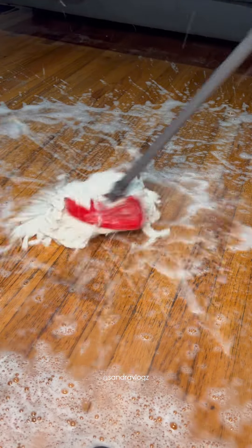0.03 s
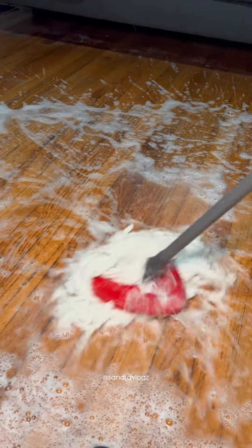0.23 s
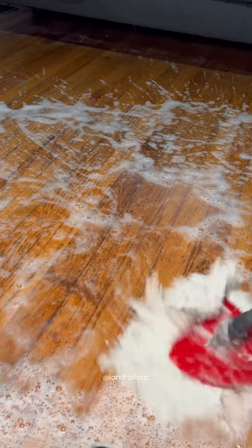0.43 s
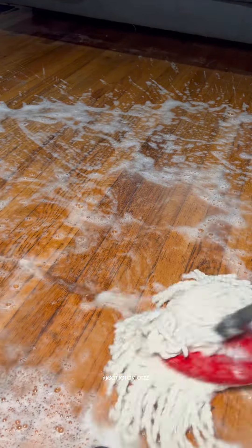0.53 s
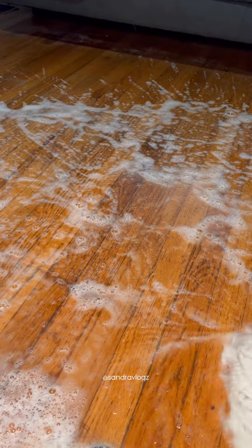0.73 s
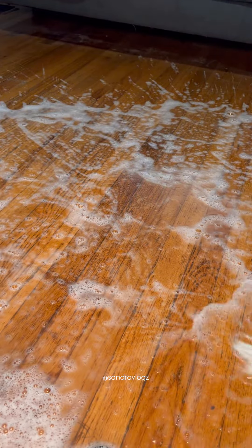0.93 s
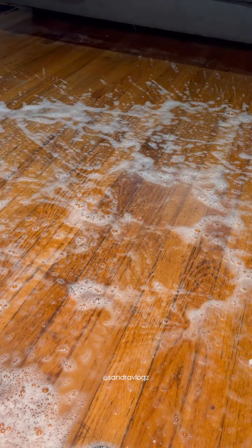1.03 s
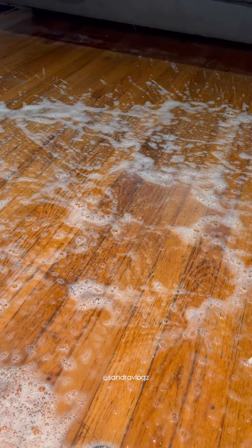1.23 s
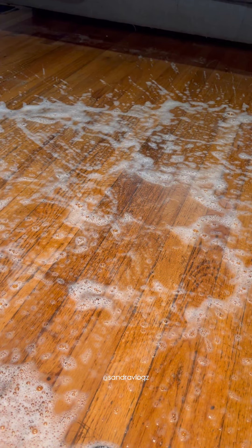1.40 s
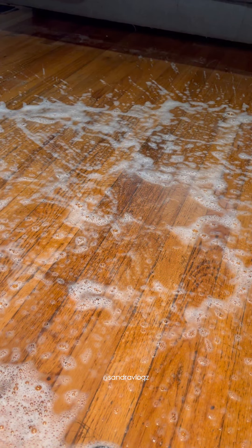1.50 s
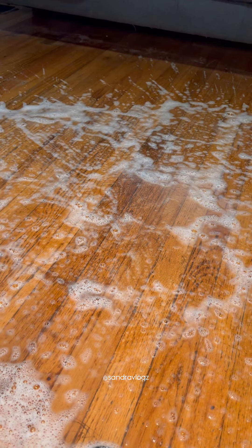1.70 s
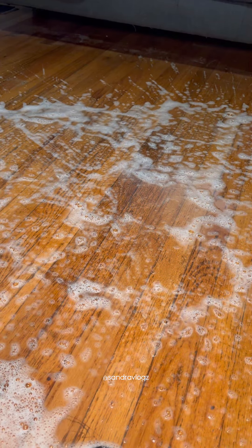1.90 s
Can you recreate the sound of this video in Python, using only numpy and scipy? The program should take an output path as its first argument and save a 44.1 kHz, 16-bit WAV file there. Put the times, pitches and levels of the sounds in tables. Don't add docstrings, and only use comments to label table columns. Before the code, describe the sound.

A soaked string mop slaps a soapy wooden floor in wet, thudding hits, then nearly stops

```python
import sys
import numpy as np
from scipy import signal
from scipy.fft import rfft, irfft, next_fast_len
from scipy.io import wavfile
from scipy.ndimage import uniform_filter1d

SR = 44100
rng = np.random.default_rng(int(sys.argv[2]) if len(sys.argv) > 2 else 0)


def to_wav(sig):
    pcm = np.clip(np.atleast_2d(sig), -1, 1) * 32767
    pcm = np.round(pcm).astype(np.int16)
    wavfile.write(sys.argv[1], SR, pcm.T)


def voltage_ratio(level):
    return 10 ** (np.asarray(level, float) / 20)


N = 85995
LEAD = 8820
M = next_fast_len(N + 2 * LEAD)
T = (np.arange(M) - LEAD) / SR
F = np.arange(M // 2 + 1) * SR / M

# [f/Hz, phase/rad]
PORT_LEAD = [(0, 0), (700, .6), (1400, .15), (2000, -.8), (2500, -2.5), (2800, -2.5), (3400, -1.6),
             (4400, -2.1), (5150, -2.1), (5550, -3.14), (7600, -6.28), (10050, -9.42), (11800, -12),
             (13100, -12.9), (14700, -15.6), (16000, -15.8)]
# [f/Hz, share/0-1]
PORT_ALIKE = [(100, 1), (350, .82), (700, .88), (1500, .93), (2500, .75), (3900, .4), (5300, .945),
              (9000, 1)]


def on_log(table):
    hz, value = np.array(table, float).T
    return np.interp(np.log(F + 1), np.log(hz), value)


def colour(x, table):
    no_rumble = F ** 2 / (F ** 2 + 30 ** 2)
    y = irfft(rfft(x) * voltage_ratio(on_log(table)) * no_rumble, M)
    return y / y.std()


def wander(samples):
    drift = uniform_filter1d(rng.standard_normal(M), size=samples)
    return drift / drift.std()


def swell(s, db, rise, fall):
    before = (T - s) / max(rise, 1e-4)
    after = (s - T) / max(fall, 1e-4)
    return voltage_ratio(2 * db) * np.exp(2 * np.where(T < s, before, after))


def droplets(spread_db):
    size = np.minimum(rng.exponential(size=M), 6)
    return rng.standard_normal(M) * voltage_ratio(spread_db * size)


def ports(same, left, right, lead, alike):
    # [f/Hz, level/dB]
    right_louder = [(150, 0), (400, 1), (2500, 0), (4500, 0.5)]
    phase = np.interp(F, *np.array(lead, float).T, right=lead[-1][1])
    turn = np.exp(.5j * phase) * voltage_ratio(on_log(right_louder) / 2)
    share = np.clip(on_log(alike), 0, 1)
    together, alone = np.sqrt(share) * same, np.sqrt(1 - share)
    return np.array([irfft(together / turn + alone * left, M),
                     irfft(together * turn + alone * right, M)])


def background():
    # [t/s, foam and air level/dB, hum level/dB]
    loudness = [(0, -45, -52.5), (1.0, -62.5, -51.5), (1.149, -64.5, -56.5), (1.21, -66.5, -59.5),
                (1.27, -67, -51), (1.501, -61.5, -56.5), (1.639, -57, -54.5), (1.73, -59.5, -54.5),
                (1.79, -59, -58), (1.95, -69, -51.5)]
    # [f/Hz, level/dB]
    tone = [(75, 18), (105, 5), (200, -0.5), (700, 0), (1800, -6.5), (3200, -6.5), (5000, -4), (16000, -11)]
    hum_hz, hum_rough, grain_db = 118.5, .18, 3.5
    s, air_db, hum_db = np.array(loudness).T
    same, left, right = (rfft(colour(droplets(grain_db), tone)) for _ in range(3))
    air = ports(same, left, right, PORT_LEAD, PORT_ALIKE)
    hum = np.sqrt(2) * (1 + hum_rough * wander(2000)) * np.sin(2 * np.pi * hum_hz * T)
    return air * voltage_ratio(np.interp(T, s, air_db)) + hum * voltage_ratio(np.interp(T, s, hum_db))


def splashes(rows, bright):
    # [f/Hz, level/dB]
    dull = [(120, 4.5), (300, -5), (600, 0.5), (1300, -1.5), (1900, -4.5), (2600, -6.5), (4000, -14.5),
            (8000, -46)]
    grain_db = 1
    slop_power = sum(swell(s, slop_db, rise, fall) for s, slop_db, _, rise, fall in rows)
    spray_power = sum(swell(s, spray_db, rise, fall) for s, _, spray_db, rise, fall in rows)
    slop = np.sqrt(slop_power) * colour(droplets(grain_db), dull)
    spray = np.sqrt(spray_power) * colour(droplets(grain_db), bright)
    return slop + spray


def boards():
    # [t/s, level/dB, push length/s]
    thuds = [
        (-.13, -21, 0.0066),
        (0.137, -23, 0.0047),
        (0.159, -25, 0.0052),
        (.402, -18.5, 0.0036),
        (.422, -63, 0.0055),
        (0.672, -20, 0.014),
        (0.734, -45.5, 0.014),
        (0.871, -32.5, 0.0079),
        (1.758, -37.5, 0.021),
    ]
    # [f/Hz, level/dB, time to fall 60 dB/s]
    modes = [(47.7, -19.5, .5), (65.2, -11.5, 0.96), (75.24, -3, 0.7), (102.8, -19.5, 0.045),
             (142.7, 3.5, 0.29), (240, -11.5, 0.18)]
    push = np.zeros(M)
    for s, db, length in thuds:
        bump = np.sin(np.pi * np.clip((T - s) / length, 0, 1)) ** 2
        push += voltage_ratio(db) * bump / (length * SR / 2)
    t = np.arange(SR) / SR
    ring = np.zeros(SR)
    for hz, db, t60 in modes:
        ring += voltage_ratio(db) * np.exp(-np.log(1000) * t / t60) * np.sin(2 * np.pi * hz * t)
    return signal.fftconvolve(push, ring)[:M]


def drags():
    # [t/s of peak, level/dB, rise/s, fall/s]
    slides = [(-.05, -25.5, .02, 0.033), (0.146, -18.5, 0.0095, 0.0085), (0.673, -33, 0.011, 0.0062),
              (0.809, -40, 0.026, 0.0091), (.845, -38.5, 0.012, 0.07), (0.896, -50, 0.0067, 0.0098),
              (1.287, -47.5, 0.023, 0.034), (1.709, -51, 0.0059, .012), (1.73, -53, 0.0067, 0.018),
              (1.768, -62.5, 0.0034, 0.046), (1.877, -47, 0.0083, 0.019)]
    # [f/Hz, level/dB]
    rumble = [(60, -26.5), (130, 1.5), (250, 0.5), (450, -2.5), (900, -25.5), (3000, -82)]
    return np.sqrt(sum(swell(*row) for row in slides)) * colour(rng.standard_normal(M), rumble)


def knocks():
    # [t/s, level/dB, start f/Hz, end f/Hz, length/s]
    blows = [
        (.128, -2, 1950, 290, .0072),
             (0.1291, -13, 1900, 1700, 0.0055), (0.134, -20, 280, 202, 0.0097),
            (0.138, -27.5, 488, 367, 0.039), (0.159, -14, 106, 64.7, 0.027),
            (0.389, -26.5, 1407, 924, 0.0026), (0.397, -12.5, 1906, 1080, 0.0057),
            (.4005, -13.5, 850, 347, 0.0057), (0.4024, -13, 1900, 1750, 0.0057),
            (0.6703, -15, 1640, 690, 0.0044), (.801, -28.5, 197, 145, 0.034), (0.838, -26, 340, 195, 0.01),
            (0.842, -29, 195, 109, 0.024), (0.882, -34.5, 120, 92.4, 0.02), (1.72, -47, 141, 136.3, 0.03),
            (1.859, -41, 288, 224, 0.023), (1.885, -47, 245, 240, 0.078)]
    glide, waver, rough, shape = .65, .04, .2, .8
    out = np.zeros(M)
    grit, sway = wander(40), wander(300)
    for s, db, hz0, hz1, length in blows:
        u = np.clip((T - s) / length, 0, 1)
        hz = hz0 * (hz1 / hz0) ** u ** glide * (u > 0) * (1 + waver * sway)
        out += voltage_ratio(db) * np.sin(np.pi * u ** shape) * np.sin(2 * np.pi * np.cumsum(hz) / SR)
    return out * (1 + rough * grit)


def pops():
    # [t/s, peak level/dB, f/Hz]
    bubbles = [(.288, -47, 11900), (.349, -45, 5700), (.3505, -46, 12000), (.355, -47, 12500),
               (.367, -50, 11500), (.62, -51, 11800), (.635, -53, 12500), (1.05, -54, 12500),
               (1.175, -57, 7500), (1.6905, -36, 12300), (1.773, -47, 12000)]
    width = .00016
    out = np.zeros(M)
    for s, db, hz in bubbles:
        burst = np.exp(-((T - s - width) / width) ** 2 * 2)
        out += voltage_ratio(db) * burst * np.sin(2 * np.pi * hz * T)
    return out


def seep():
    # [t/s of peak, level/dB, rise/s, fall/s]
    trickles = [
        (1.05, -59, .008, 0.035),
        (1.237, -71, 0.053, 0.025),
    ]
    # [f/Hz, level/dB]
    hiss = [(1500, -60), (2700, -25), (2950, 0), (3250, 0), (3500, -25), (4500, -60)]
    return np.sqrt(sum(swell(*row) for row in trickles)) * colour(rng.standard_normal(M), hiss)


def echoes():
    gap, low_t60, top_t60 = 0.0066, 0.51, 0.5
    t = np.arange(M) / SR
    noise = rng.standard_normal(M) * (t > gap)
    low = signal.lfilter([.25], [1, -.75], noise)
    top = noise - low
    tail = low * np.exp(-np.log(1000) * t / low_t60) + top * np.exp(-np.log(1000) * t / top_t60)
    return rfft(tail / np.sqrt(np.sum(tail ** 2)))


def heard(rows, bright, lead, alike, solid=0):
    room = voltage_ratio(-10)
    same, left, right = (rfft(splashes(rows, bright)) for _ in range(3))
    same = same + rfft(solid + np.zeros(M))
    left = left + room * same * echoes()
    right = right + room * same * echoes()
    return ports(same * (1 + room * echoes()), left, right, lead, alike)


def mop_in_front():
    # [t/s of peak, slop level/dB, spray level/dB, rise/s, fall/s]
    landings = [(-.14, -14, -24.5, 0.0036, 0.046), (.1285, -7.5, -15, 0.00093, 0.0021),
                (.15, -21, -25, 0.01, 0.021), (.197, -25, -32, 0.0014, 0.013),
                (.265, -34.5, -43, 0.0026, 0.025), (.287, -52, -49.5, 0.002074, 0.0031),
                (.348, -52, -43.5, 0.0017, 0.0096), (.365, -50.5, -61, 0.0022, 0.0054),
                (.401, -14, -18.5, .005, 0.0076), (.412, -29, -28, 0.0058, 0.039),
                (.445, -35, -41, 0.0049, 0.022), (.51, -35.5, -62.5, .01, 0.034),
                (.628, -74.5, -57, 0.0032, 0.0011), (.663, -23, -25, 0.0053, 0.0097),
                (.674, -24, -21.5, 0.0061, 0.0093), (.684, -25.5, -33, 0.0092, 0.026),
                (.8, -40.5, -54.5, 0.016, 0.03), (.8345, -40, -37.5, .0004, 0.0027),
                (.84, -50, -38, 0.0032, 0.018), (.865, -49, -44, 0.0045, 0.06),
                (.909, -34.5, -47, 0.0046, 0.0074), (1.262, -59, -64.5, .012, 0.014),
                (1.28, -47.5, -56.5, 0.011, 0.014), (1.3, -48.5, -60, .008, .04),
                (1.38, -61, -72, 0.036, 0.15), (1.708, -60.5, -62.5, .005, 0.031),
                (1.765, -62.5, -63, 0.0041, 0.0067)]
    # [f/Hz, level/dB]
    bright = [(1200, -25), (2800, -9.5), (4200, -7), (5000, -2.5), (6300, -8.5), (9000, -9), (13000, -12),
              (16000, -20.5)]
    return heard(landings, bright, PORT_LEAD, PORT_ALIKE, knocks() + pops() + seep())


def mop_aside():
    # [t/s of peak, slop level/dB, spray level/dB, rise/s, fall/s]
    landings = [
        (1.8442, -35, -32.5, 0.00025, 0.0025),
        (1.856, -33.5, -33, 0.0059, 0.0054),
        (1.872, -47, -50.5, 0.0036, 0.017),
    ]
    # [f/Hz, level/dB]
    bright = [(700, -7.5), (1200, -6.5), (2300, 0), (3500, -2.5), (6000, -11.5), (10000, -12),
              (14500, -10.5), (16500, -24)]
    # [f/Hz, phase/rad]
    lead = [(0, 0), (1000, .8), (2500, .7), (5500, -3), (8000, -1.6), (11000, -3.2), (16000, -6.3)]
    # [f/Hz, share/0-1]
    alike = [(100, 0.96), (3500, 0.99), (6000, 0.437), (10000, 0.1), (15000, .9)]
    return heard(landings, bright, lead, alike)


def scene():
    out = background() + mop_in_front() + boards() + drags() + mop_aside()
    return out[:, LEAD:LEAD + N]


def band_limit(x):
    return signal.sosfilt(signal.butter(12, 16480, fs=SR, output="sos"), x)


def record(dry):
    low_cut = signal.butter(4, 42, "high", fs=SR, output="sos")
    top_cut = signal.ellip(8, .2, 70, 16300, fs=SR, output="sos")
    mix = signal.sosfilt(top_cut, signal.sosfilt(low_cut, dry))
    return band_limit(mix)


dry = scene()
out = record(dry)
to_wav(out)
```